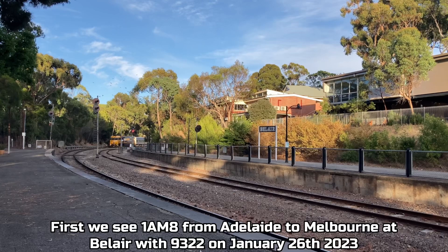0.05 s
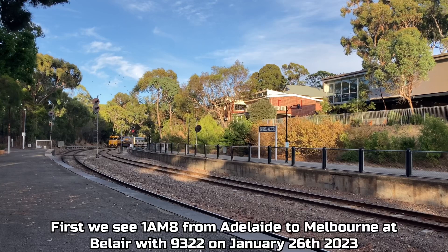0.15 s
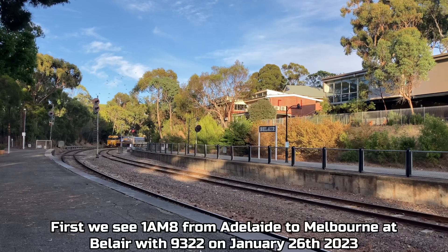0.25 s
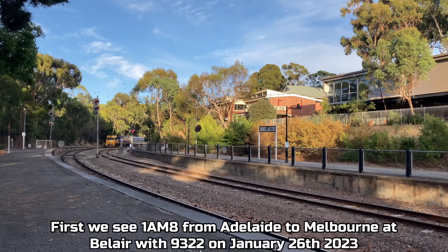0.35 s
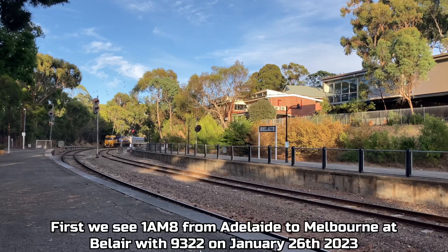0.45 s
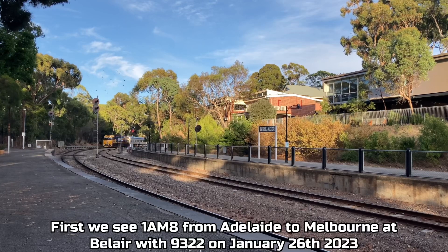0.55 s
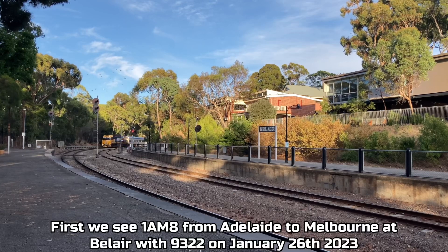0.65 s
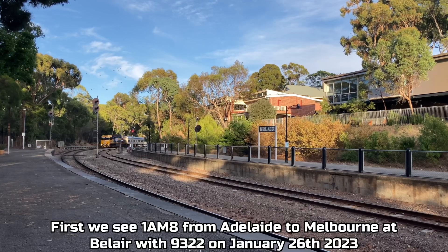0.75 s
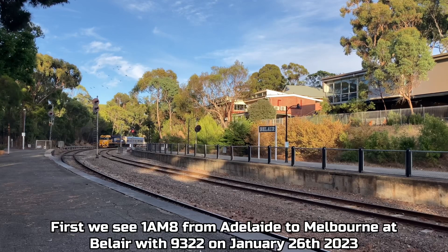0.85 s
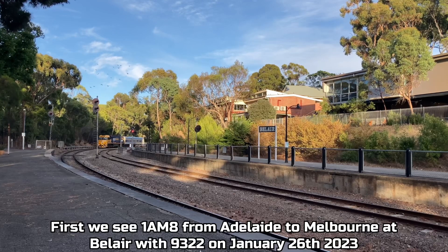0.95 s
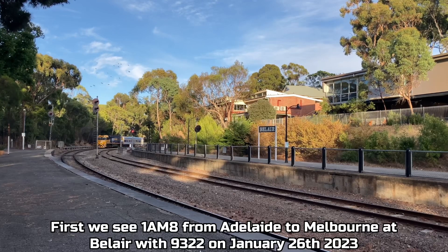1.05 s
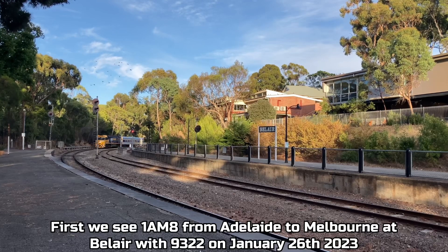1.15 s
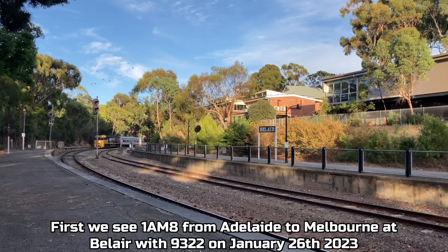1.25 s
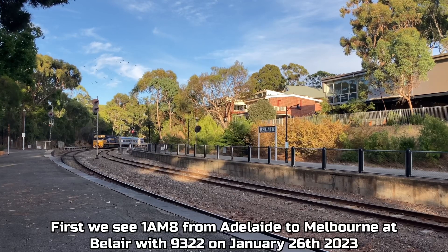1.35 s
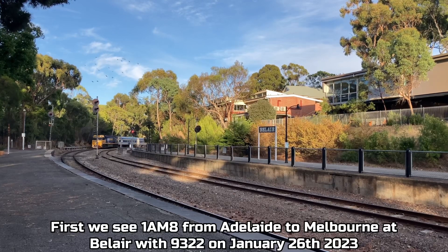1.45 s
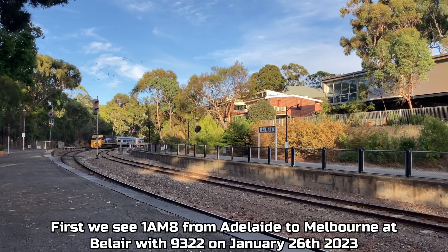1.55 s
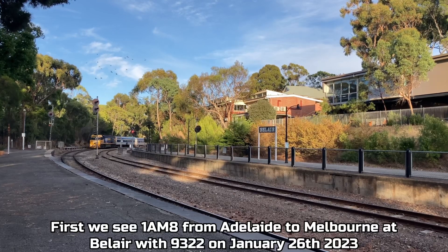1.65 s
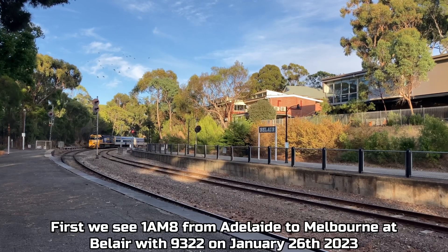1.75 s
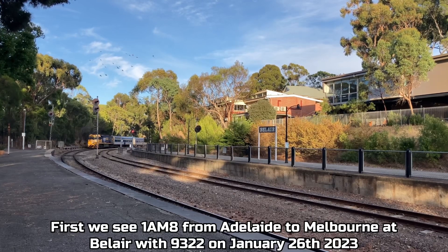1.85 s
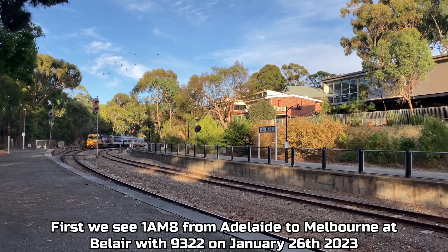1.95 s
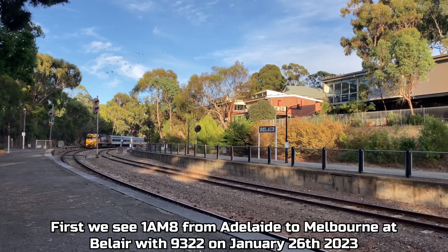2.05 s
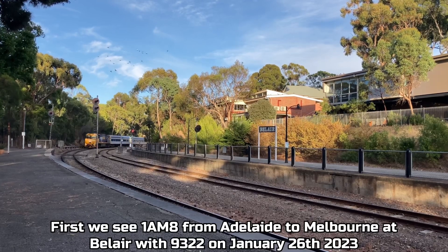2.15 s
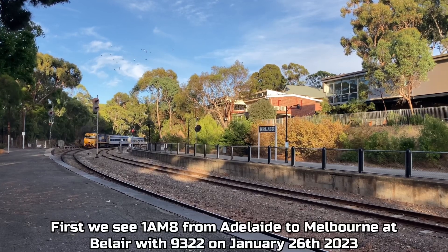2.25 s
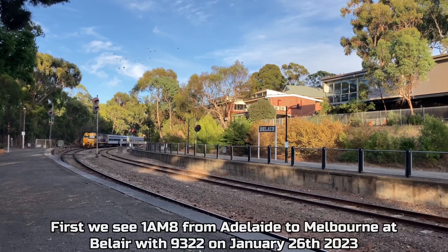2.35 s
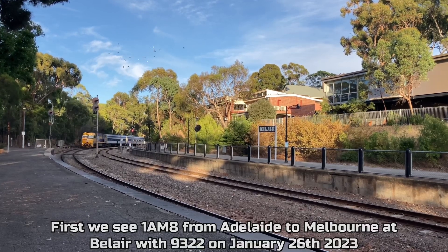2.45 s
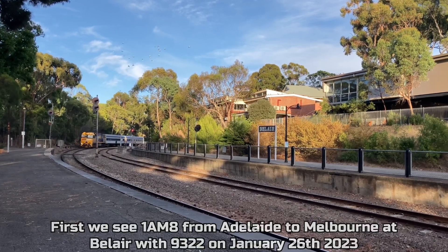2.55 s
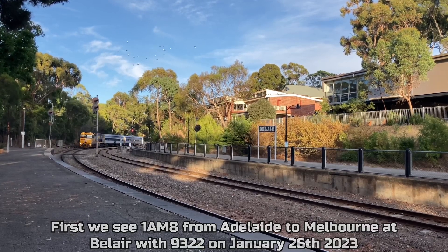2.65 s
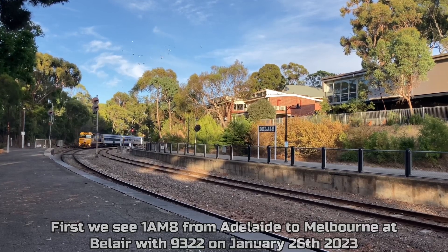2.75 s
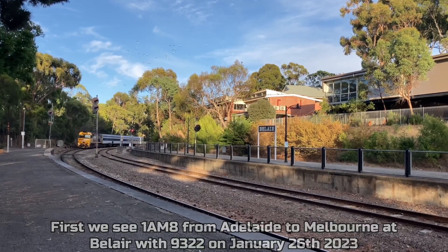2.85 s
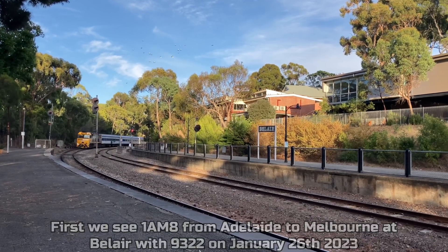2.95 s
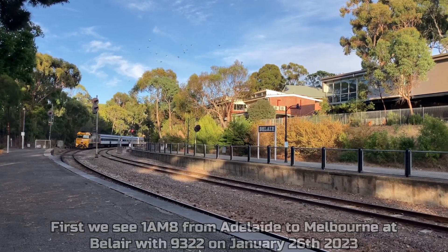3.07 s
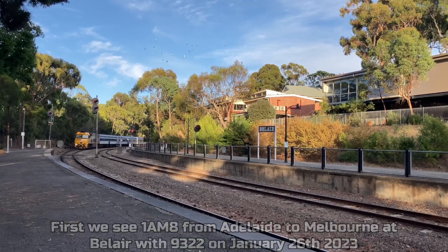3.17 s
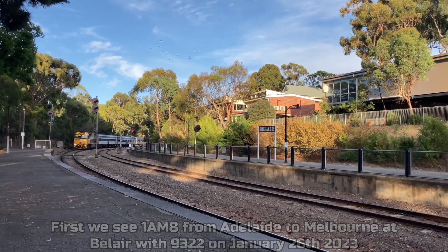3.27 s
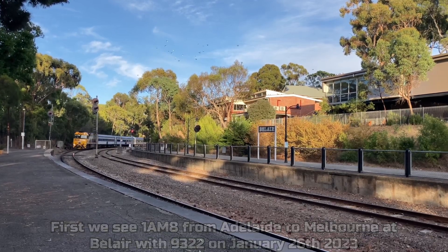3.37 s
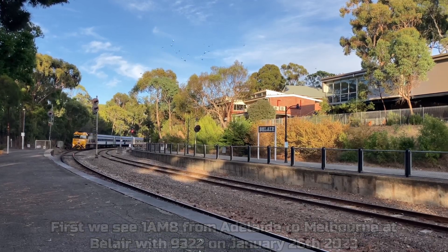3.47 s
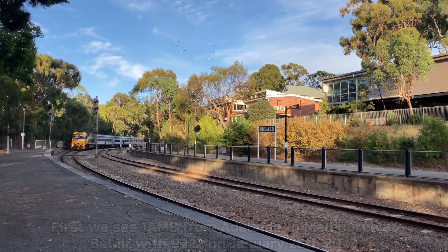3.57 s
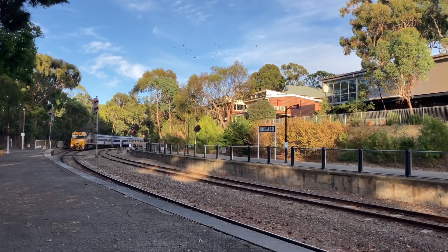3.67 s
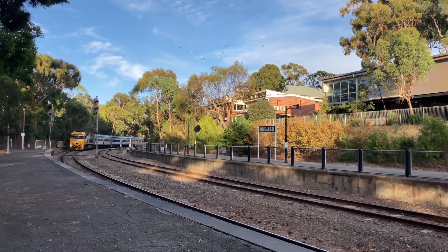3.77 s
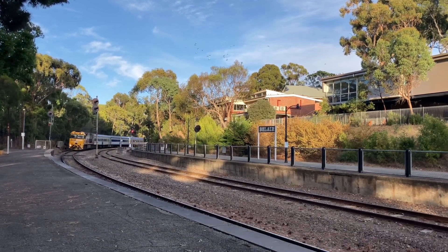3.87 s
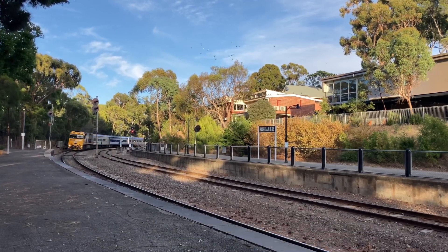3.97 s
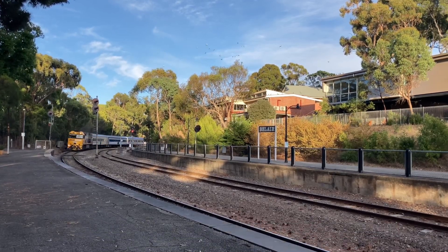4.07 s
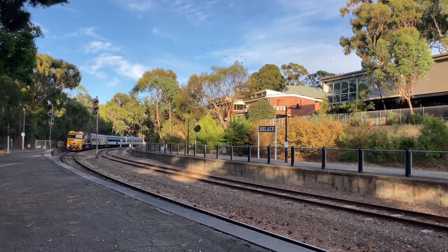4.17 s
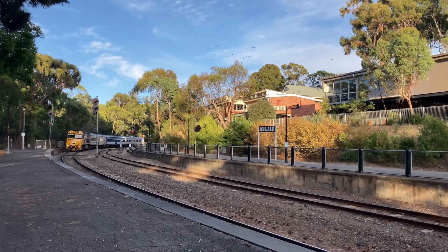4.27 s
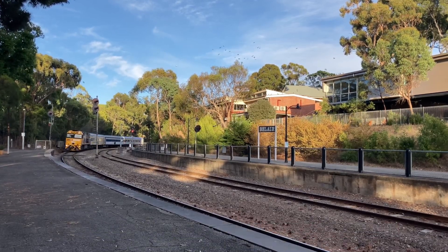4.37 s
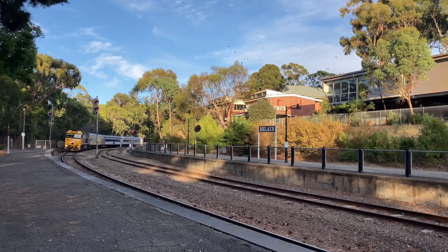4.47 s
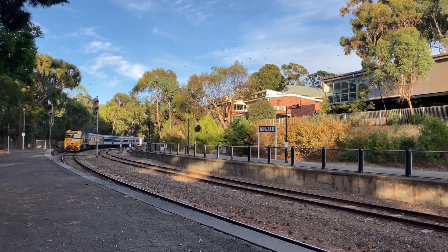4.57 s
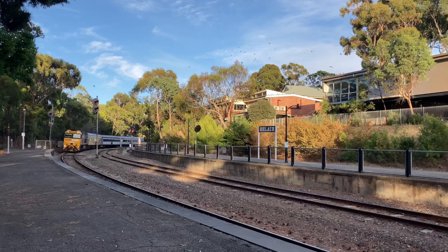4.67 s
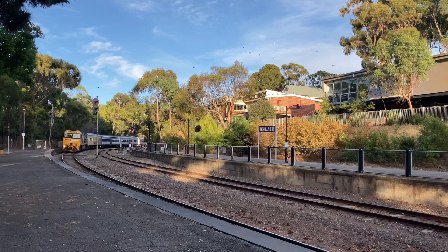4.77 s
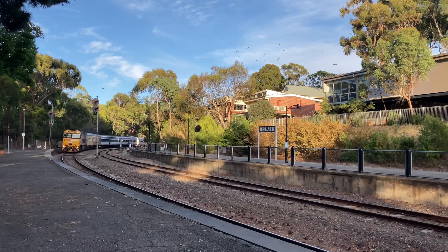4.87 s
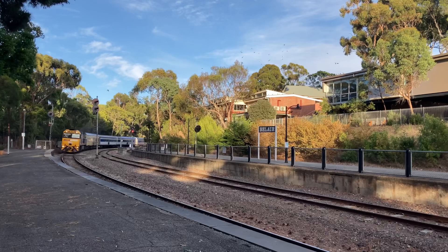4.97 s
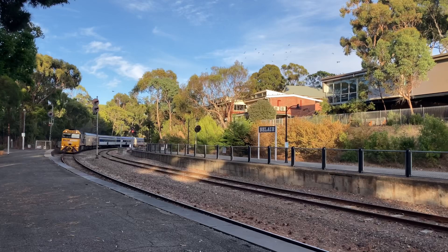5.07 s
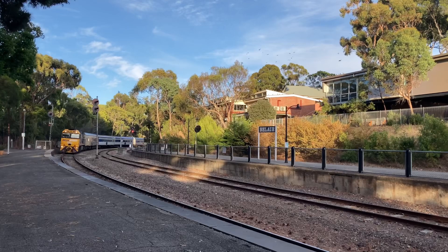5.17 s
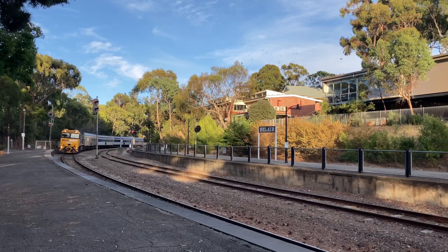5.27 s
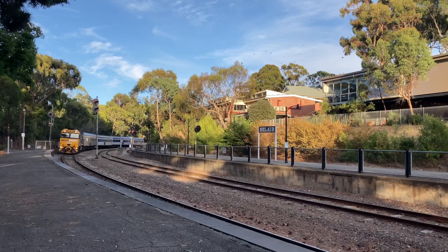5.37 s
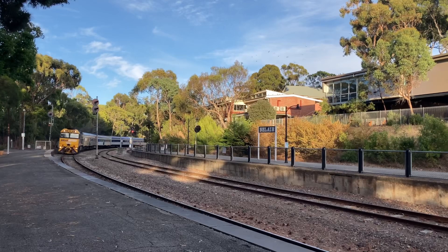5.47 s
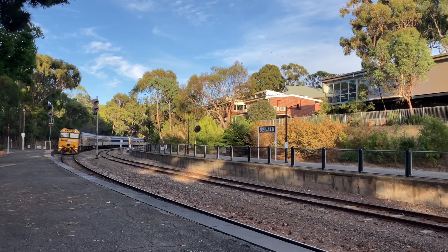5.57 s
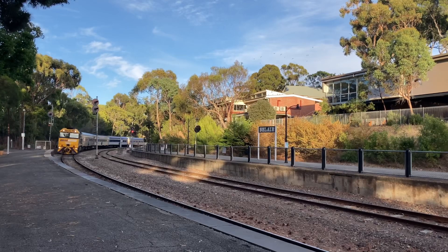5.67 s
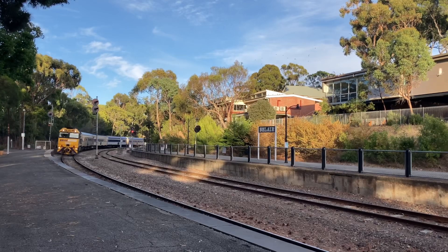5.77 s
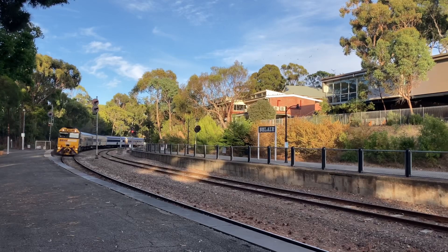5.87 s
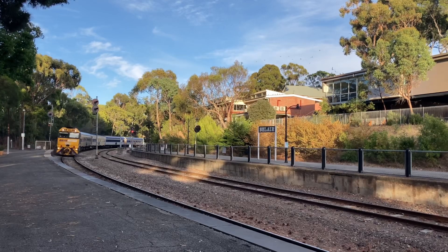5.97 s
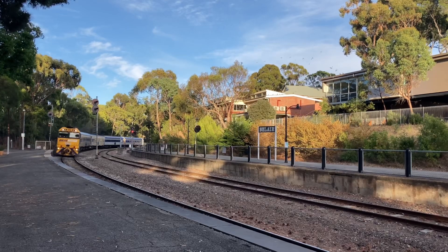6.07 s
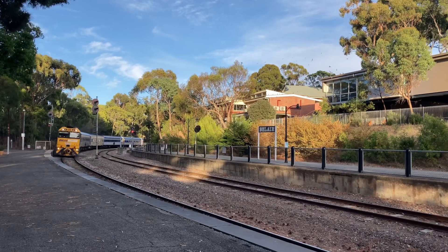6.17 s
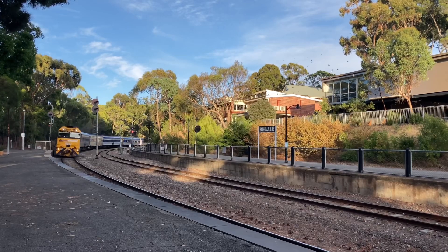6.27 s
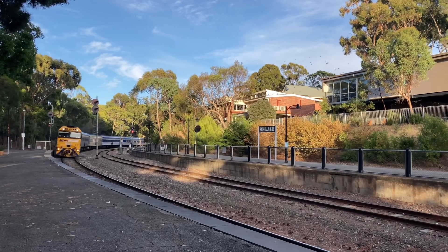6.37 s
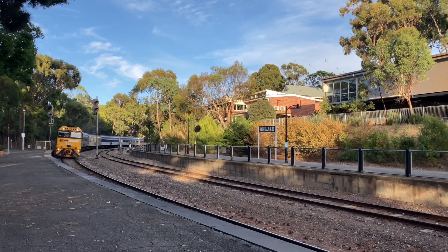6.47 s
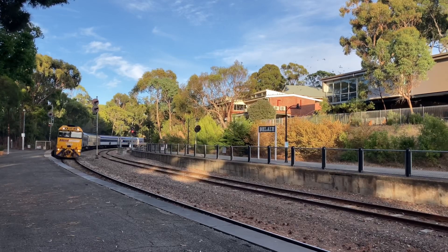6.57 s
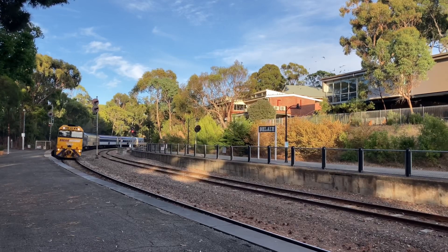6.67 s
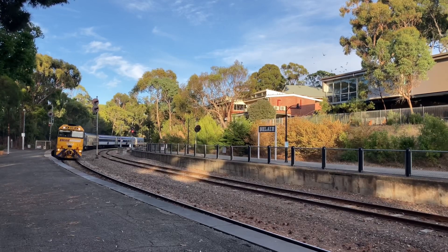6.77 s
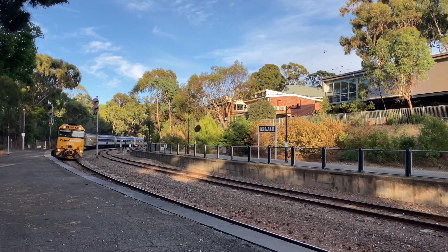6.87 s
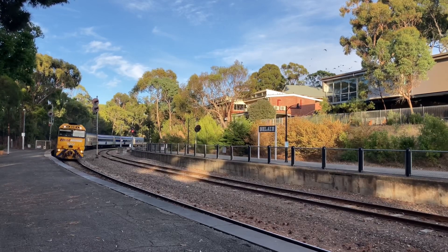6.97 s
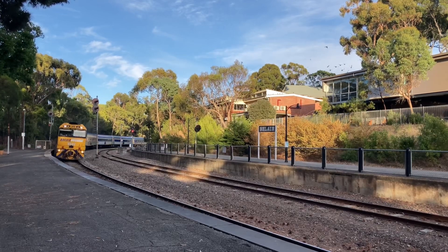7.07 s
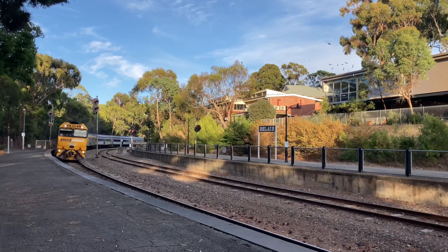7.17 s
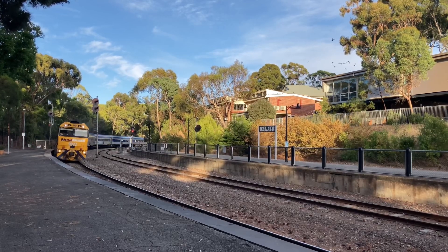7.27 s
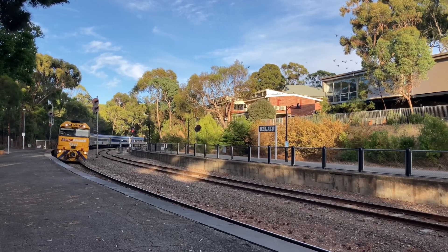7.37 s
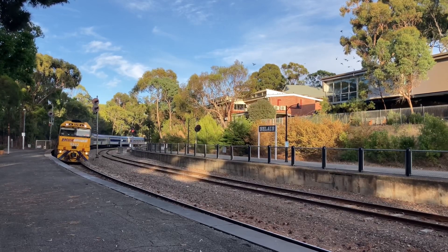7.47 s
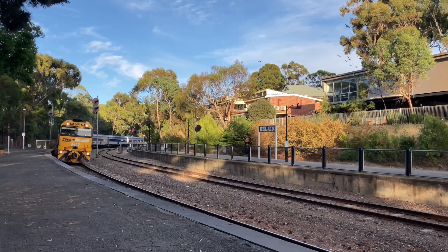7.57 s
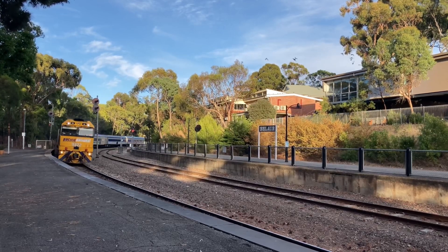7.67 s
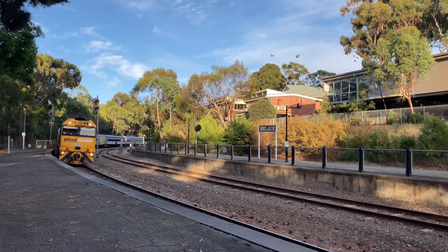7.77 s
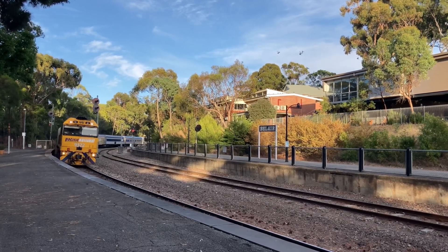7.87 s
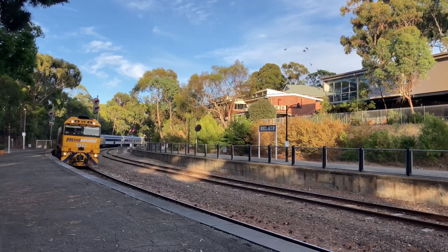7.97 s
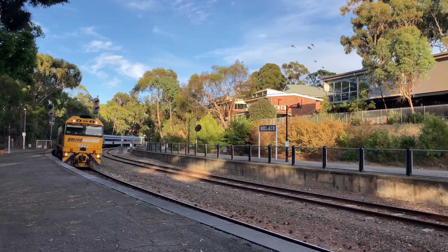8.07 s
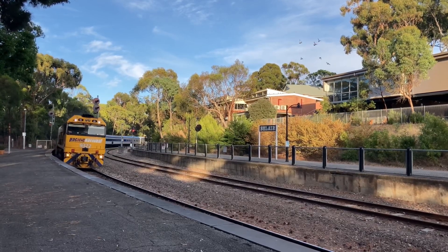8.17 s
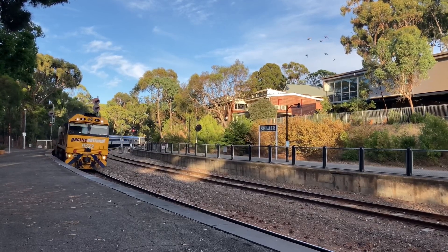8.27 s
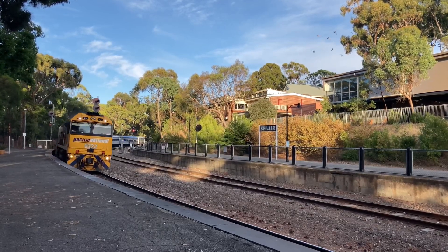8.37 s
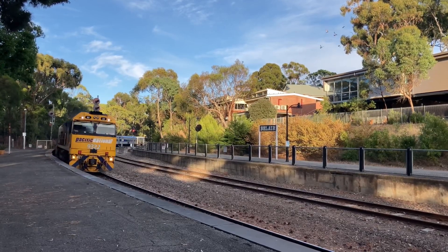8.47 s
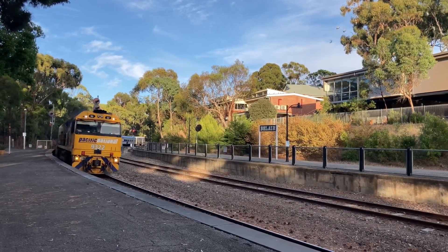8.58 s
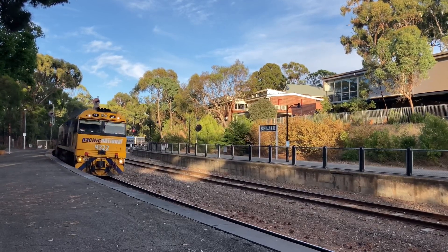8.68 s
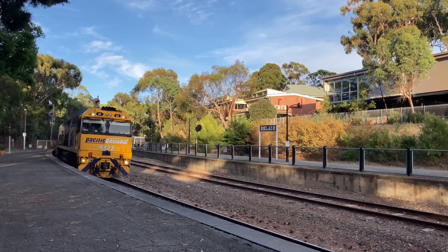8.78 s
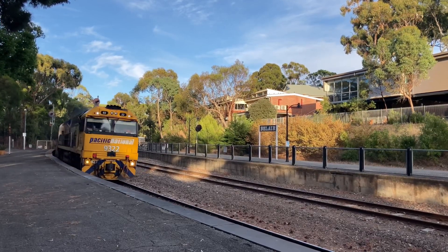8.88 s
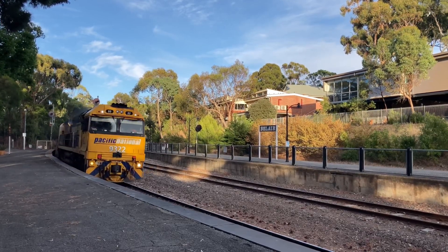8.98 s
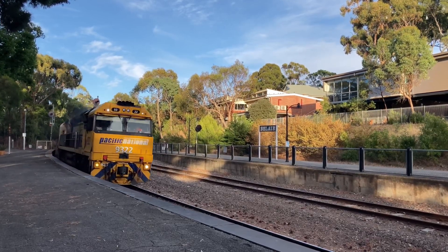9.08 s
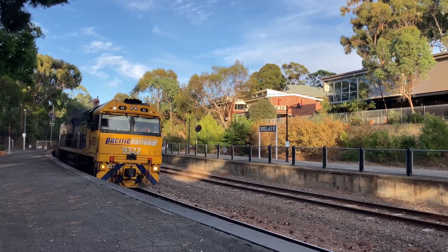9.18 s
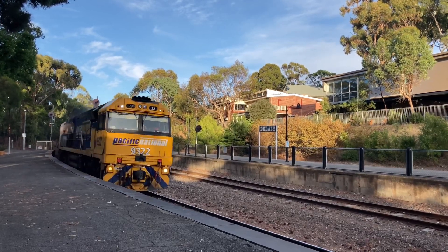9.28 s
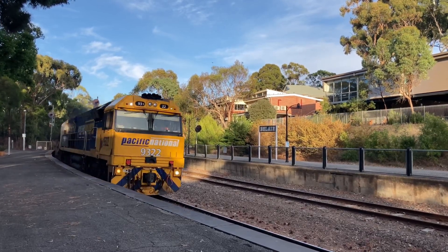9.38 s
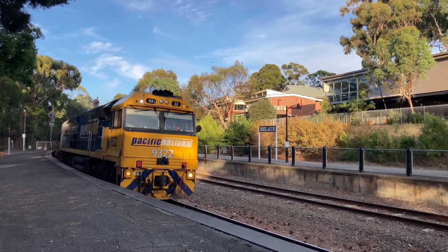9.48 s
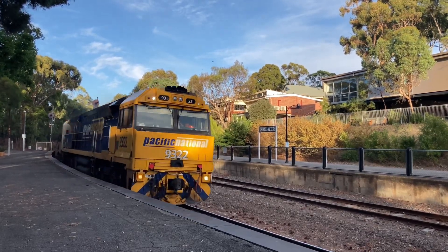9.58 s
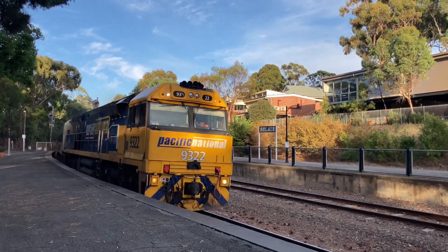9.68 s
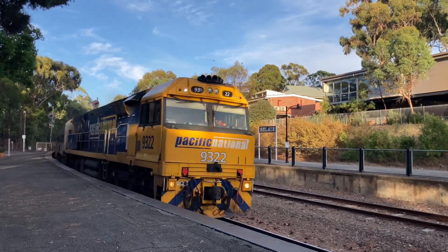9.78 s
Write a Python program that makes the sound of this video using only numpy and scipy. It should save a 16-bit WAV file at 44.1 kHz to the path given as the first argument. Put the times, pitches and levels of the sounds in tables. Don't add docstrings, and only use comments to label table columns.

```python
import sys
import numpy as np
from scipy import signal
from scipy.fft import rfft, irfft, next_fast_len
from scipy.io import wavfile

SR = 44100
rng = np.random.default_rng(int(sys.argv[2]) if len(sys.argv) > 2 else 0)


def dump_mix(stems):
    frames = np.atleast_2d(stems).T
    limited = np.clip(frames, -1, 1)
    pcm = np.round(limited * 32767).astype(np.int16)
    wavfile.write(sys.argv[1], SR, pcm)


def boost(x):
    u = np.asarray(x, float) / 20
    return 10 ** u


N = 433503

REGION_HZ = [200, 900, 2600, 6000, 10500, 13500]
# frequency in Hz, density in dB per Hz.
RUMBLE_COLOUR = [(15, -35), (25, -23), (60, 10.5), (176, 0), (280, -4.5), (496, -15), (615, -10),
                 (710, -11), (920, -20), (1430, -17), (1800, -24.5), (2340, -68), (3960, -120)]
# frequency in Hz, density in dB per Hz.
RAIL_COLOUR = [(1800, 4), (2500, 3), (3500, 1.5), (4400, -1), (5300, -8), (6500, 1), (7500, 2), (8500, -2),
               (10500, -2), (12000, -2.5), (13300, -4), (14300, -9), (15500, -12)]
# frequency in Hz, width in Hz, lift in dB.
WHEEL = [(2010, 270, 4.5), (2540, 180, 5), (3077, 45, 5.5), (3900, 370, 0.5), (4720, 110, 5.5),
         (5740, 98, 1.5), (6500, 29, 3.5), (8300, 120, -1.5), (9840, 260, 4.5), (10300, 240, 2),
         (10800, 57, 9), (12365, 44, -10), (13600, 400, 3)]
# time in seconds, level in dB about the mean.
NEARNESS = [(0, -7.5), (1.1, -6), (3.1, -3), (3.5, -3.5), (4.5, -2), (5.5, -1), (5.85, 2.5), (6.5, 4),
            (7.0, 4.5), (7.55, 6), (7.85, 9), (8.6, 10), (9.06, 12.5), (9.25, 9.5), (9.83, 9)]
# time in seconds, level in dB about the mean.
GRIP = [(0, -9), (.5, -8), (1.6, -8), (3, -8), (4.2, -6), (4.8, -1.5), (5.64, -3), (5.72, 3), (6.3, 1),
        (6.85, 2.5), (7.6, 3.5), (8.2, 8.5), (8.95, 13), (9.1, 17.5), (9.39, 24), (9.53, 20.5),
        (9.64, 20.5), (9.83, 18.5)]
# mean level in dB, share of nearness (ratio), share of grip (ratio).
ROLLING = [
    (-32, 1, 0.0053),
    (-41, 0.81, 0.093),
    (-50.5, .01, 0.91),
    (-48, 0.079, 0.81),
    (-50, 0.17, 1.04),
    (-47.5, 0.75, 0.64),
]
# centre in seconds, length in seconds,
# frequency in Hz, lift in dB (negative for a dip).
BITES = [(.1, 0.31, 6160, 5), (.7, 1.6, 4300, -3), (1.65, 0.65, 9400, 3.5), (2.85, 0.086, 6000, 3.5),
         (3.06, .08, 11000, 4), (3.25, 0.5, 6040, 4.5), (9.62, 0.36, 6300, -1), (6.13, .1, 2600, 6.5),
         (6.16, 0.046, 900, 1), (6.27, 0.084, 11000, 5.5), (6.38, 0.45, 6000, 5), (6.7, 0.6, 11000, -2.5),
         (6.96, 0.094, 11000, 10), (6.98, 0.05, 414, -16.5), (7.28, 0.21, 2630, 4), (7.66, 0.12, 300, 3),
         (7.72, .06, 10870, 1.5), (7.99, 0.1, 3500, 5), (8.05, 0.83, 6000, -2.5), (8.21, 0.21, 11000, 3),
         (9.0, .12, 10800, 5.5), (9.05, 0.11, 900, 2), (9.1, 0.15, 6000, 0.5), (9.22, .1, 11000, 4.5),
         (9.55, 0.17, 885, -6), (.6, 2.1, 14000, -6.5), (9.8, 0.2, 11000, 5)]
BITE_OCTAVES, SURGE_OCTAVES = 0.69, .12

# centre in seconds, length in seconds, frequency in Hz, width in Hz, level in dB.
TOUCHES = [(1.4, .1, 4500, 49, -59), (1.55, .25, 3530, 40, -63), (6.052, 0.24, 2010, 150, -50),
           (6.628, .08, 4000, 31, -46), (6.636, 0.079, 3260, 400, -41), (6.968, 0.086, 7750, 60, -39),
           (7.205, 0.24, 3900, 90, -41), (7.19, 0.18, 3040, 53, -44), (7.605, .15, 7700, 12.2, -44),
           (7.8, 0.18, 8750, 160, -42), (9.43, 0.32, 4720, 150, -30), (5.852, 0.13, 95, 13, -21.5),
           (7.753, 0.14, 138.5, 8.3, -35.5), (8.964, 0.2, 130.2, 47, -28), (2.205, 0.28, 3150, 14, -53.5),
           (5.802, 0.19, 3600, 500, -49), (9.401, 0.19, 3058, 64, -51)]
# time in seconds, level in dB.
FAR_SQUEAL = [
    (1.3, -80),
    (1.44, -63),
    (1.75, -50.5),
    (2.3, -42),
    (2.9, -42),
    (3.2, -35.5),
    (3.5, -43),
    (4.03, -55),
    (4.3, -77),
]
NEAR_SQUEAL = [
    (8.95, -48),
    (9.048, -46),
    (9.104, -24),
    (9.304, -32),
    (9.356, -27.5),
    (9.618, -32.5),
    (9.632, -26.5),
    (9.798, -27),
    (9.83, -29),
]
MID_SQUEAL = [
    (5.6, -69),
    (5.83, -40),
    (6.42, -39.5),
    (6.86, -44),
    (7.53, -60),
    (8.05, -37),
    (8.83, -36),
    (9.13, -24.5),
    (9.83, -26.5),
]
HIGH_SQUEAL = [
    (3, -70),
    (3.3, -59.5),
    (4.5, -53),
    (5.2, -50.5),
    (6.6, -50),
    (6.8, -43),
    (7.101, -36.5),
    (7.45, -41),
    (7.7, -66),
]
FAR_HZ = [3965, 3830, 3920, 3150, 4925]
NEAR_HZ = [3941, 3870, 3920, 4735, 5600, 3080]
MID_HZ = [7279, 7447, 7681, 11300, 11930, 6800]
HIGH_HZ = [13254, 12600, 13100]
# width in Hz, level in dB.
FAR_MODES = [(10.3, -5), (30.2, -7.5), (169, -3), (10, -27), (10, -25)]
NEAR_MODES = [(14, -4.5), (35, -8), (171, -7), (150, -17), (250, -17), (57.4, -35)]
MID_MODES = [(18, -11), (46, -13.5), (45, -9.5), (30, -23), (30, -30), (300, -15)]
HIGH_MODES = [(30, 6), (45, -5), (200, 0)]
# centre in seconds, length in seconds, lift in dB.
CATCHES = [(1.803, 0.17, 6), (2.124, 0.053, 4), (2.446, .06, 5), (2.52, 0.096, -3), (2.83, 0.12, 5),
           (2.922, 0.059, 5.5), (3.028, 0.2, 3.5), (3.287, 0.074, -4), (3.41, 0.033, 1.5), (4.107, .08, 4),
           (7.004, .15, 4), (8.24, .08, 6.5), (8.3, .08, -6), (9.23, 0.046, 0.5), (9.465, .1, 3.5),
           (9.617, .08, 3.5)]

# frequency in Hz, width in Hz.
EXHAUST_ORDERS = [(46.5, 4.0), (61.2, 1.2)]
# frequency in Hz, width in Hz.
BOOM_MODES = [(245, 32.4), (300, 22.7), (410, 30)]
# time in seconds, frequency in Hz.
FAN = [
    (0, 377.2),
    (3.6, 371.6),
    (4.35, 360.8),
    (5.5, 361.2),
    (6.5, 350.4),
    (8.6, 349.1),
    (9.83, 343),
]
FAN_WIDTH_HZ = [13.2, 23.6, 30.5, 28]
# mean level in dB, share of nearness (ratio).
EXHAUST_LEVEL = [(-35.5, -0.35), (-41.5, 0.86)]
BOOM_LEVEL = [(-44, 1.21), (-44, 1.08), (-57, 0.71)]
FAN_LEVEL = [(-57.5, 1.5), (-51.5, 0.75), (-55.5, 1.01), (-57.5, 1.28)]
# centre in seconds, length in seconds, frequency in Hz, lift in dB.
THROBS = [(.42, 0.16, 47.7, 4), (1.25, 0.17, 48, 6), (2.5, 0.83, 48, 1), (2.87, 0.086, 48, -15),
          (3.8, .15, 48, 10), (4.95, 0.32, 48, -6), (5.8, 1.1, 48, 8), (6.72, 0.33, 46.6, 1),
          (7.1, 0.33, 48, 13), (7.45, 0.17, 48, 13), (7.63, 0.19, 48, -20), (9.55, .15, 48, -8),
          (0.0, 0.29, 61, 15), (1.29, .12, 64, -9), (2.0, 0.32, 61, -12), (2.75, .3, 61, 12),
          (3.6, 0.73, 61, 7), (4.75, 0.92, 61, 15.5), (5.5, .6, 62, 14), (6.2, 0.93, 61, 13),
          (7.02, 0.29, 61, 20.5), (7.31, .12, 61, -10), (7.5, 0.36, 61, -5), (8.7, 0.68, 61, 15.5),
          (9.17, 0.34, 58.4, -16), (9.42, .12, 61, 14), (9.57, .15, 61, -15), (9.83, .2, 61, 8)]
# centre in seconds, length in seconds, frequency in Hz, lift in dB.
SWELLS = [(5.3, 0.32, 280, 4), (0.735, .2, 245, 10), (1.52, 0.79, 245, 6), (2.67, .8, 245, 7),
          (5.6, 0.27, 245, 7), (7.4, 0.41, 245, 4.5), (7.86, 0.18, 245, 10), (9.06, 0.44, 245, 1.5),
          (1.7, 0.27, 300, 6.5), (2.34, 0.54, 300, 7), (4.11, .25, 300, 7), (5.56, 0.17, 300, -14),
          (6.4, .15, 300, 6), (6.05, 0.3, 300, 10), (7.14, 0.49, 300, 6.5), (9.06, 0.34, 300, 6.5),
          (9.5, 0.24, 280, -15), (.9, 0.25, 410, 4), (1.8, 0.15, 450, 9), (4.4, .5, 410, 14),
          (7.1, .3, 410, 8), (6.8, 2.2, 410, 16), (7.9, 0.053, 353, 3), (5.9, 1.4, 652, 19),
          (1.66, 0.68, 1080, 4), (5.65, 2.2, 1080, -7), (4.8, 1.7, 1450, -5.5)]

# frequency in Hz, likeness from 0 to 1.
LIKENESS = [(40, .995), (150, .98), (300, .93), (500, .66), (900, .45), (2500, .55), (5000, .45),
            (6300, .86), (16000, .87)]
# frequency in Hz, left minus right in dB.
BALANCE_DB = [(60, -3.0), (120, -3.5), (240, 0.5), (480, 0), (950, 2.5), (1890, 2.0), (3770, 3),
              (7520, -4.5), (15000, 5)]
# frequency in Hz, left port's lead in half turns.
LEAD = [(0, 0), (700, .2), (1700, .65), (4000, .8), (6900, 0.0), (9100, -1.0), (11400, -2.0), (13750, -3.0),
        (15700, -4.0)]


def in_time(rows):
    s, *columns = np.transpose(rows)
    return [np.interp(np.arange(N) / SR, s, c) for c in columns]


def at_hz(points, hz):
    return np.interp(np.log(hz), np.log(np.array(points)[:, 0]), np.array(points)[:, 1])


def swell(s, length):
    return np.exp(-((np.arange(0, N, 64) / SR - s) / length * 2) ** 2)


def lift_db(rows, hz, octaves):
    coarse = 0
    for s, length, at, db in rows:
        reach = np.exp(-(np.log2(hz / at) / octaves) ** 2)
        coarse = coarse + db * reach * swell(s, length)
    return np.interp(np.arange(N), np.arange(0, N, 64), coarse)


def drift(rate, step=16):
    r = np.exp(-2 * np.pi * step * rate / SR)
    slow = signal.lfilter([1], [1, -2 * r, r * r], rng.standard_normal(N // step + 3002))[3000:]
    return np.interp(np.arange(N) / step, np.arange(len(slow)), slow / slow.std())


def narrow(turns, width_hz):
    steady = np.clip(1 - width_hz / 16, 0, 1)
    wander = drift(width_hz) + 1j * drift(width_hz)
    return (np.sqrt(2 * steady) + np.sqrt(1 - steady) * wander) * np.exp(2j * np.pi * turns)


def port_lead(hz):
    return np.pi * np.interp(hz, *np.transpose(LEAD))


def ports(paths):
    size = next_fast_len(N)
    hz = np.arange(size // 2 + 1) * SR / size + 1
    direct, scattered = rfft(paths, size)
    alike = np.clip(at_hz(LIKENESS, hz), 0, 1)
    same = np.sqrt((1 + alike) / 2) * direct
    opposed = np.sqrt((1 - alike) / 2) * scattered
    half = boost(at_hz(BALANCE_DB, hz) / 2) * np.exp(.5j * port_lead(hz))
    return irfft([(same + opposed) * half, (same - opposed) / half], size)[:, :N]


def rolling(patchy_db, rail_db):
    near_db, grip_db = in_time(NEARNESS)[0], in_time(GRIP)[0]
    region_db = [db + near * near_db + grip * grip_db for db, near, grip in ROLLING]
    out, together = 0, drift(5.0)
    edges = 25 * 2 ** np.arange(0, 9.4, 1 / 3)
    white = rng.standard_normal((2, 2, N))
    for k, (low, high) in enumerate(zip(edges, edges[1:])):
        hz = np.sqrt(low * high)
        if hz < RAIL_COLOUR[0][0]:
            colour_db = at_hz(RUMBLE_COLOUR, hz) + 6.04 * np.log2(max(hz / 200, 1))
        else:
            colour_db = at_hz(RAIL_COLOUR, hz) + rail_db
        place = np.interp(np.log(hz), np.log(REGION_HZ), np.arange(len(ROLLING)))
        below = min(int(place), 4)
        moving_db = region_db[below] * (1 + below - place) + region_db[below + 1] * (place - below)
        moving_db = moving_db + lift_db(BITES, hz, BITE_OCTAVES)
        gusts = .5 * together + drift(7.0) + .7 * drift(1.2)
        flicker_db = patchy_db * min(hz / 4000, 1) * gusts
        band_pass = signal.butter(2, [low, high], "band", fs=SR, output="sos")
        band = signal.sosfilt(band_pass, white[k % 2])
        out = out + boost(colour_db + moving_db + flicker_db) * band
    return out


def wheel_colour(x):
    size = next_fast_len(N)
    hz = np.arange(size // 2 + 1) * SR / size
    ring_db = sum(db / (1 + ((hz - centre) / width * 2) ** 2) for centre, width, db in WHEEL)
    return irfft(rfft(x, size) * boost(ring_db), size)[:, :N]


def touches():
    t, out = np.arange(N) / SR, 0
    for s, length, hz, width, db in TOUCHES:
        envelope = boost(db) * np.exp(-((t - s) / length * 2) ** 2)
        direct = narrow(hz * t, width)
        scattered = np.sqrt(1 - at_hz(LIKENESS, hz)) * narrow(hz * t, width)
        left = (direct + scattered) * np.exp(1j * port_lead(hz))
        out = out + envelope * np.array([left, direct - scattered]).real
    return out


def squeal(pitches, modes, level, lead, scatter_db):
    t, out = np.arange(N) / SR, 0
    for hz, (width, db) in zip(pitches, modes):
        direct = narrow(hz * t, width) * boost(db + 2.0 * drift(3.0))
        scattered = narrow(hz * t, width) * boost(db + scatter_db) * 1j
        left = (direct + scattered) * np.exp(1j * lead(hz))
        out = out + np.array([left, direct - scattered]).real
    start, end = (level[0][0] - .05, -120), (level[-1][0] + .05, -120)
    level_db = in_time([start] + list(level) + [end])[0]
    catch_db = lift_db([(s, length, 1, db) for s, length, db in CATCHES], 1, 1)
    return boost(level_db + catch_db) * out


def engine():
    t = np.arange(N) / SR
    near_db, blade_hz = in_time(NEARNESS)[0], in_time(FAN)[0]
    fan_turns = np.cumsum(blade_hz) / SR
    sway = np.cumsum(1 + .015 * drift(.6)) / SR

    def level(row, hz):
        return row[0] + row[1] * near_db + lift_db(THROBS + SWELLS, hz, SURGE_OCTAVES)

    lines = []   # turns, width in Hz, level in dB
    for (hz, width), row in zip(EXHAUST_ORDERS, EXHAUST_LEVEL):
        lines.append((hz * t, width, level(row, hz) - 7.0))
    for k, row in enumerate(FAN_LEVEL):
        harmonic_db = level(row, (k + 1) * blade_hz.mean()) + 7.0
        lines.append(((k + 1) * fan_turns, FAN_WIDTH_HZ[k], harmonic_db))
    for (hz, width), row in zip(BOOM_MODES, BOOM_LEVEL):
        lines.append((hz * sway, width, level(row, hz) - 0.5))
    return np.array([sum(boost(db) * narrow(turns, width).real for turns, width, db in lines) for path in range(2)])


def mask_quiet_bands(pair, pair_db, mask_db, slope_db, chance_db, round_db):
    cutoff_hz, pair_from_hz, starved_from_hz = 15900, 6100, 13700
    window = np.sin(np.pi * (np.arange(2048) + .5) / 2048)
    hz, _, bins = signal.stft(pair, SR, window, 2048, 1024)
    bands = bins[:, :1024].reshape(2, 64, 16, -1)
    level = 10 * np.log10(np.mean(abs(bands) ** 2, axis=2) + 1e-20)
    louder, centre_hz = level.max(axis=0), hz[8:1024:16, None]
    starved = centre_hz > starved_from_hz
    fall = np.cumsum(np.where(starved, .5, slope_db), axis=0)
    masker = np.where(centre_hz > 3000, louder + fall, -200)
    from_below = np.maximum.accumulate(masker, axis=0) - fall
    from_other = np.where(centre_hz > pair_from_hz, louder + pair_db + 2 * starved, -200)
    hidden = np.maximum(from_below + mask_db + 2 * starved, from_other)
    chance = chance_db * (1 + 2 * starved) * rng.standard_normal(level.shape)
    kept = level + chance > hidden
    bands *= (kept & (centre_hz < cutoff_hz))[:, :, None]
    strips = bands.reshape(2, 64, 4, 4, -1)
    strip_db = 10 * np.log10(np.mean(abs(strips) ** 2, axis=3) + 1e-20)
    weak = (strip_db < louder[:, None] + round_db) & (centre_hz[:, None] > 2600)
    bands = strips * ~weak[:, :, :, None]
    bins[:, :1024] = bands.reshape(2, 1024, -1)
    bins[:, 1024] = 0
    return signal.istft(bins, SR, window, 2048, 1024)[1][:, :N]


def scene():
    train = boost(15.0) * wheel_colour(rolling(patchy_db=1.0, rail_db=-4)) + engine()
    mix = ports(train) + touches()
    mix = mix + squeal(FAR_HZ, FAR_MODES, FAR_SQUEAL, lambda hz: 2.5, scatter_db=-4.5)
    mix = mix + squeal(NEAR_HZ, NEAR_MODES, NEAR_SQUEAL, lambda hz: .2, scatter_db=-2.5)
    mix = mix + squeal(MID_HZ, MID_MODES, MID_SQUEAL, port_lead, scatter_db=-2)
    return mix + squeal(HIGH_HZ, HIGH_MODES, HIGH_SQUEAL, port_lead, scatter_db=-14)


def band_limit(x):
    return signal.sosfilt(signal.butter(12, 17100, fs=SR, output="sos"), x)


def record(dry):
    pair = np.array([dry[0] + dry[1], dry[0] - dry[1]]) / 2
    mid, side = mask_quiet_bands(pair, pair_db=-6.5, mask_db=-10, slope_db=6, chance_db=1.6, round_db=-8)
    return band_limit(np.array([mid + side, mid - side]))


dry = scene()
out = record(dry)
dump_mix(out)
```